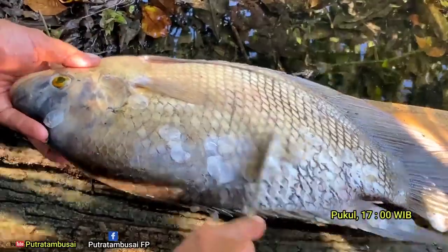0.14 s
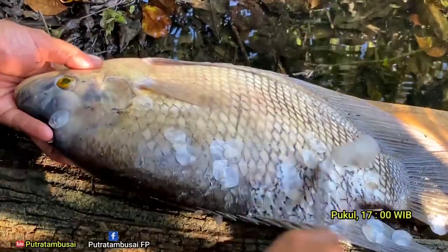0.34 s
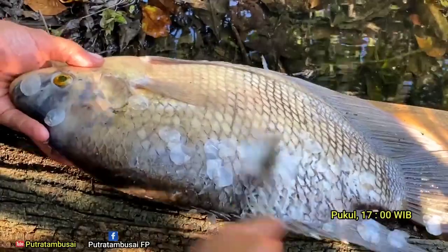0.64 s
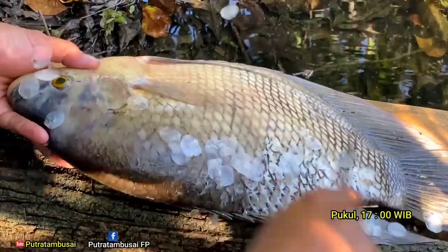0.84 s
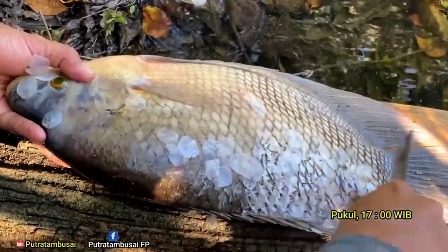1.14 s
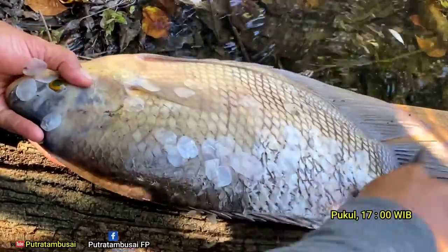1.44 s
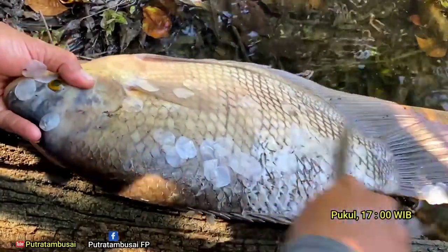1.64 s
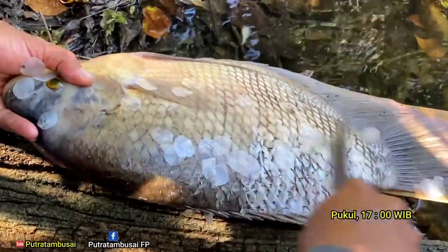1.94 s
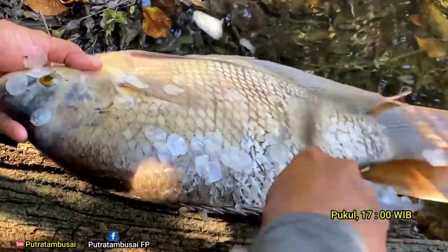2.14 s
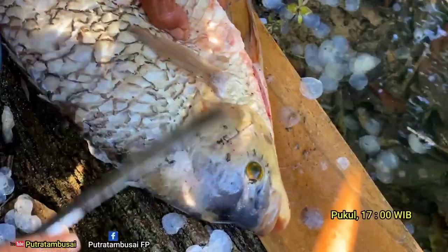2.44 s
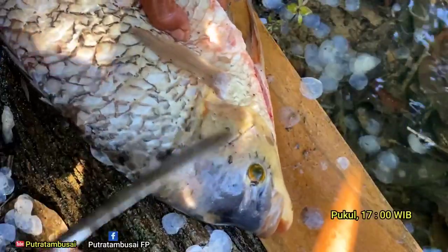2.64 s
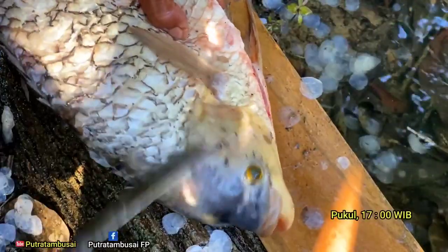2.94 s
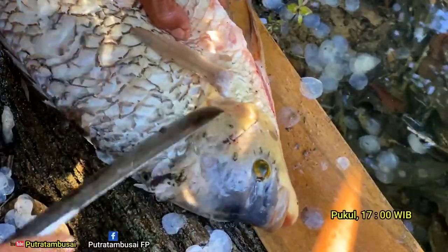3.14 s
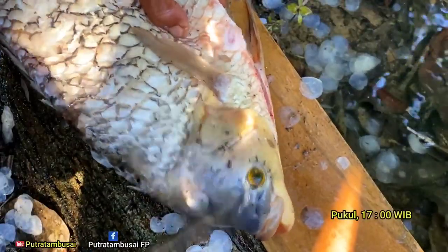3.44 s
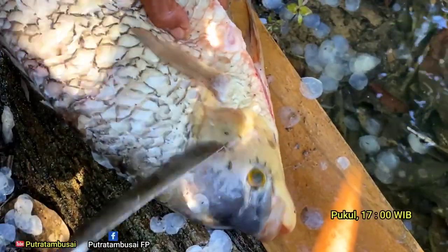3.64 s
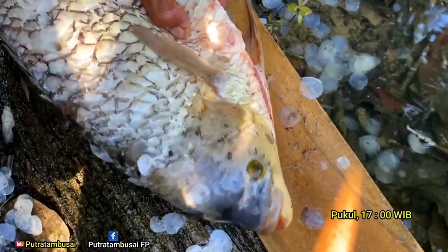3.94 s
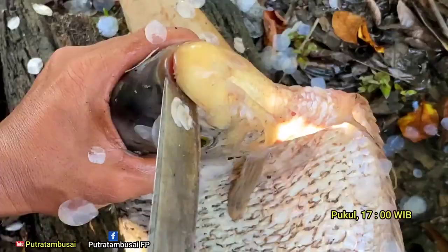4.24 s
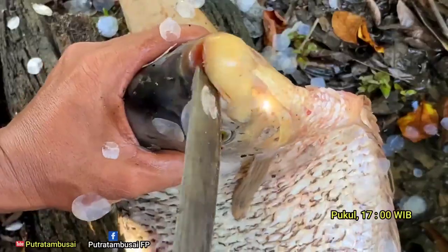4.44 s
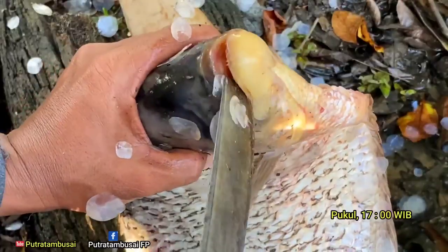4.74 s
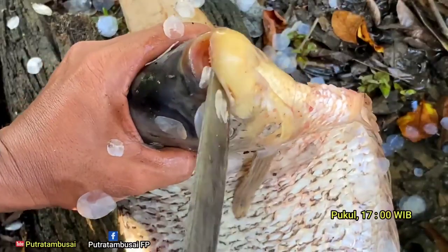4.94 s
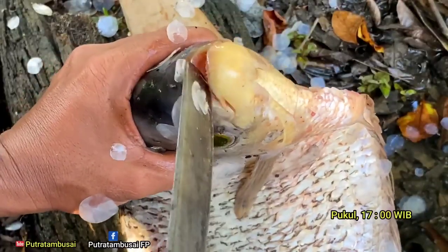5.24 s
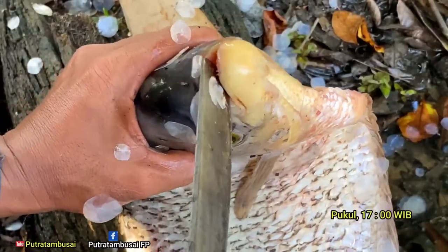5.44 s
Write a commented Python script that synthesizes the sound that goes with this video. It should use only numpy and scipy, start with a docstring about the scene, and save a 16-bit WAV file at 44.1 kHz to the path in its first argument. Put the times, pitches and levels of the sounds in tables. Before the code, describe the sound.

A knife rasps scales off a fish in quick crackling strokes, then picks and scrapes at its bony head, with faint birds behind.

```python
"""Scaling a fish by a river

A knife drags over a fish on a log, about four strokes a second. Friction makes the rasp, bent scales
snap loose, slime squelches and the wet flesh thumps; then picks and scrapes at the bony head excite
the modes of the blade. Far birds, insects, a faint engine and a low outdoor rumble lie behind.
A phone close by hears it all through two microphone ports."""
import sys
import numpy as np
from scipy import signal
from scipy.fft import rfft, irfft
from scipy.io import wavfile
from scipy.ndimage import uniform_filter1d, map_coordinates

SR = 44100
rng = np.random.default_rng(int(sys.argv[2]) if len(sys.argv) > 2 else 0)


def inscribe(sig):
    """Save sig as 16-bit PCM at rate SR to the path in sys.argv[1].

    A 1-D sig is mono; a 2-D sig holds one channel per row.
    Samples are clipped to [-1, 1] before scaling.
    """
    pcm = np.round(np.clip(np.atleast_2d(sig).T, -1, 1) * 32767)
    wavfile.write(sys.argv[1], SR, pcm.astype(np.int16))


N = 246519
TIME = np.arange(N) / SR


def undb(db):
    """Amplitude ratio of a level in decibels."""
    return 10 ** (np.asarray(db) / 20)


def unit(x):
    """Normalisation to rms 1."""
    return x / np.sqrt(np.mean(x ** 2))


def add(track, start_s, sound):
    """Superposition of a sound on a track."""
    i = int(round(start_s * SR))
    lo, hi = max(i, 0), min(i + len(sound), N)
    if hi > lo:
        track[lo:hi] += sound[lo - i:hi - i]


def freqs(size):
    """Bin frequencies of a Fourier transform, kept above zero."""
    return np.maximum(np.arange(size // 2 + 1) * SR / size, 1)


def shape(points, hz):
    """Interpolation of (frequency [Hz], value) points on a logarithmic frequency axis."""
    f, value = np.transpose(points)
    return np.interp(np.log(hz), np.log(f), value)


def colour(x, db):
    """Spectral shaping by a gain for every bin; rms 1."""
    return unit(irfft(rfft(x) * undb(db), len(x)))


def noise(spectrum, size=N):
    """Gaussian noise shaped by (frequency [Hz], level [dB]) points; rms 1."""
    return colour(rng.standard_normal(size), shape(spectrum, freqs(size)))


def wander(position):
    """Smooth random modulation, with a new value at every whole position; spread near 1."""
    return map_coordinates(rng.standard_normal(4096), [position], order=2, mode="wrap")


def envelope(x, smooth_s):
    """Amplitude envelope as a running rms."""
    return np.sqrt(np.maximum(uniform_filter1d(x ** 2, max(int(smooth_s * SR), 1)), 0))


def glides(events, jitter, jitter_hz, shimmer_db, shimmer_hz):
    """Exponential sine sweeps that swell and fade, randomly modulated in pitch and level."""
    out = np.zeros(N)
    for start, length, first_hz, last_hz, db in events:
        t = np.arange(0, length, 1 / SR)
        pitch = np.geomspace(first_hz, last_hz, len(t)) * (1 + jitter * wander(t * jitter_hz))
        gain = undb(db + shimmer_db * wander(t * shimmer_hz)) * np.hanning(len(t))
        add(out, start, gain * np.sqrt(2) * np.sin(2 * np.pi * np.cumsum(pitch) / SR))
    return out


# Phase gap between the microphone ports: (frequency [Hz], lead of the left port [rad])
PORT_PHASE = [(20, 0), (2700, 0), (3400, .5), (5000, .45), (5900, -.6), (6500, 0), (7750, 0), (8100, 2),
              (9000, 2.1), (10400, .15), (11300, -.1), (13300, -3.1), (15300, -6.2)]
def ports(x):
    """Phase difference: both ports hear the same sound, with a gap that depends on frequency."""
    turn = np.exp(0.5j * shape(PORT_PHASE, freqs(N)))
    return np.array([irfft(rfft(x) * turn, N), irfft(rfft(x) / turn, N)])


# How much scattered sound differs between the ports: (frequency [Hz], gain [dB])
DIFFUSE_WIDTH = [(100, -6), (900, 4), (1900, -17.5), (5000, -10.5), (9000, -8.5), (15000, -11)]
def diffuse_side(x):
    """Partial coherence: a diffuse field leaves a difference signal between the ports."""
    return irfft(rfft(x) * undb(shape(DIFFUSE_WIDTH, freqs(N))), N)


# Spectra of the outdoor rumble and the insect chorus: (frequency [Hz], relative level [dB])
RUMBLE_SPECTRUM = [(20, -37.5), (35, -13.5), (55, 4), (120, -2.5), (250, -5), (450, -19), (1000, -29),
                   (2500, -28), (6000, -32.5), (12000, -38.5), (16000, -40.5)]
INSECT_SPECTRUM = [(4000, -29), (6800, -14.5), (7700, 0), (9200, 5), (10400, -8.5), (12500, -18),
                   (15000, -30)]
# Course of the background: (time [s], rumble level [dB], insect level [dB])
BACKGROUND_LEVELS = [(0, -50.5, -66), (1.3, -56.5, -72), (2.098, -57.5, -66), (2.8, -51, -56),
                     (3.5, -57.5, -66.5), (4.2, -57.5, -61.5), (4.6, -53, -57), (5.59, -51.5, -57)]
def riverbank():
    """Ambient noise: a low rumble and the hiss of insects, each slightly amplitude-modulated."""
    times, rumble_db, insect_db = np.transpose(BACKGROUND_LEVELS)
    rumble = noise(RUMBLE_SPECTRUM) * undb(np.interp(TIME, times, rumble_db) + 2 * wander(TIME * 22))
    insects = noise(INSECT_SPECTRUM) * undb(np.interp(TIME, times, insect_db) + 0.8 * wander(TIME * 30))
    return rumble + insects


# Harmonics of a far engine: (multiple of the firing rate, relative level [dB])
ENGINE_ORDERS = [(2, -1.5), (3, -36.5), (4, -11), (5, -4), (6, -2)]
def engine(firing_hz=292, level_db=-64, fade_start_s=0.9, fade_db_per_s=46):
    """Harmonic series on a wavering firing rate: a faint drone that dies away."""
    phase = 2 * np.pi * np.cumsum(firing_hz * (1 + 0.028 * wander(TIME * 50))) / SR
    drone = sum(undb(db + 3.3 * wander(TIME * 14)) * np.sin(round(k) * phase) for k, db in ENGINE_ORDERS)
    return undb(level_db - fade_db_per_s * np.maximum(TIME - fade_start_s, 0)) * drone


def through_trees(x, direct_db=-9, wash_db=-3, wash_s=0.037):
    """Multipath propagation: far sounds arrive mostly by way of leaves and trunks; stereo."""
    t = np.arange(SR // 2) / SR
    paths = rng.standard_normal((2, len(t))) * np.exp(-t / wash_s) / np.sqrt(wash_s * SR / 2)
    return undb(direct_db) * x + undb(wash_db) * signal.fftconvolve(x[None], paths, axes=1)[:, :N]


# Far bird calls: (time [s], duration [s], first pitch [Hz], last pitch [Hz], level [dB])
WHISTLES = [(0.939, .1, 3710, 5490, -42), (1.436, 0.068, 5430, 4500, -50.5),
            (1.471, 0.038, 4410, 4250, -43), (2.805, .055, 1850, 2520, -52), (4.779, .2, 2700, 2910, -53),
            (5.002, 0.075, 2700, 1890, -59.5)]
def birds():
    """Frequency modulation: thin gliding whistles, made unsteady by their way through the trees."""
    return glides(WHISTLES, jitter=0.013, jitter_hz=350, shimmer_db=2, shimmer_hz=120)


def scatter(x, near_s=0.004, near_db=-15, far_s=0.031, far_db=-21, onset_s=0.0077):
    """Early reflections off the log and arm, then reverberation from the trees; different at each port."""
    t = np.arange(SR * 3 // 4) / SR
    spectrum = [(100, 3.5), (800, 1.5), (3000, 2), (7000, 2.5), (15000, -1.5)]
    near = undb(near_db) * np.exp(-t / near_s) / np.sqrt(near_s * SR / 2)
    far = undb(far_db) * np.exp(-t / far_s) / np.sqrt(far_s * SR / 2)
    onset = 1 - np.exp(-t / onset_s)
    responses = [noise(spectrum, len(t)) * (near + far) * onset for _ in range(2)]
    return undb(2.5) * np.array([signal.fftconvolve(x, response)[:N] for response in responses])


# Spectrum of the shaken log: (frequency [Hz], relative level [dB])
LOG_SPECTRUM = [(30, -25.5), (60, 0.5), (100, 5.5), (200, -14), (350, -16.5), (900, -30), (3000, -59)]
def log_rumble(rasp, gain_db=-23):
    """Forced vibration: each stroke shakes the fish and the log under it."""
    return undb(gain_db) * envelope(rasp, smooth_s=0.049) * noise(LOG_SPECTRUM)


# Slime squeezed from under the edge:
# (time [s], duration [s], first pitch [Hz], last pitch [Hz], level [dB])
SQUELCHES = [(1.143, 0.016, 2430, 3860, -30.5), (1.757, 0.019, 2090, 3280, -55),
             (3.31, .016, 3150, 5310, -20.5), (3.411, 0.013, 814, 1050, -55.5)]
def squelches():
    """Resonance of a shrinking gap: as the wet gap closes, its rough whistle rises."""
    return glides(SQUELCHES, jitter=0.05, jitter_hz=2000, shimmer_db=4.2, shimmer_hz=900)


# Slaps of the blade on the flesh: (time [s], relative level [dB], nominal pitch [Hz])
THUMPS = [(0.199, -36.5, 102), (.274, -35, 267), (.49, -37.5, 97), (1.025, -27.5, 186), (1.05, -27.5, 206),
          (1.309, -27, 232), (1.335, -26, 209), (1.381, -29.5, 210), (1.395, -27.5, 258),
          (1.581, -9.5, 554), (1.628, -31, 250), (1.668, -23.5, 252), (1.685, -32, 121.4),
          (1.874, -30, 272), (1.967, -26, 238), (2.166, -22, 292), (2.201, -24.5, 517), (2.222, -28.5, 125),
          (2.275, -27, 191), (2.314, -34, 254), (2.4, -25, 555), (2.445, -25, 390), (2.631, -24, 563),
          (2.856, -30, 580), (3.077, -20.5, 502), (3.113, -30.5, 255), (3.374, -34.5, 220),
          (3.567, -27.5, 275), (3.599, -17.5, 408), (3.81, -41, 595), (4.259, -17.5, 680),
          (4.275, -16, 640), (4.481, -27, 830), (4.502, -15, 763)]
def thumps(first_ratio=2.28, last_ratio=0.855, glide_cycles=0.58, attack_cycles=0.72, ring_cycles=2.25):
    """Damped oscillation: a splash, and a rough thud whose pitch drops as more of the body gives way."""
    out, t = np.zeros(N), np.arange(4096) / SR
    splash_spectrum = [(100, -17), (900, -3), (2000, 10.5), (5000, -20.5), (15000, -25.5)]
    splash_db, splash_s = -15, 0.0013
    for start, db, hz in THUMPS:
        cycles = t * hz
        pitch = hz * (last_ratio + (first_ratio - last_ratio) * np.exp(-cycles / glide_cycles))
        pitch *= np.exp(0.27 * wander(cycles * 2))
        thud = np.sin(2 * np.pi * np.cumsum(pitch) / SR) * undb(2 * wander(cycles * 2))
        thud *= (1 - np.exp(-cycles / attack_cycles)) * np.exp(-cycles / ring_cycles)
        splash = undb(splash_db) * noise(splash_spectrum, len(t)) * np.exp(-t / splash_s)
        add(out, start, undb(db + 4) * (thud + splash))
    return out


def crackle(spectrum, tilt_db, grain_db, grain_hz, ripple_db, size=16384):
    """Stick-slip friction: dense, uneven slips; each patch has its own broad and narrow resonances."""
    hz = freqs(size)
    slips = rng.standard_normal(size)
    slips *= undb(grain_db * np.clip(wander(np.arange(size) / SR * grain_hz), -2, 2))
    resonances_db = ripple_db * (wander(hz / 700) + 0.85 * wander(hz / 170))
    octaves = np.log2(np.maximum(hz, 1500) / 5000)
    return colour(slips, spectrum(hz) + tilt_db * octaves + resonances_db)


def push(t, rise_s, fall_s):
    """Contact pressure peaking at t = 0: Gaussian build-up, exponential release."""
    return np.where(t < 0, np.exp(-(t / rise_s) ** 2), np.exp(-np.abs(t) / fall_s))


def add_burst(track, peak_s, carrier, rise_s, fall_s):
    """Amplitude modulation of a carrier by one push, mixed in to peak at peak_s."""
    t = np.arange(len(carrier)) / SR - 3 * rise_s
    add(track, peak_s - 3 * rise_s, carrier * push(t, rise_s, fall_s))


def drag(carrier, bite_s, hold_s, release_s, ridges_per_s=85, jolt_db=-1, jolt_s=0.0061):
    """Sliding contact: the edge touches, bites, holds and lifts; each ridge gives a decaying jolt."""
    touch_db, settle_s = -14.5, 0.00065  # touch-down relative to full pressure
    t = np.arange(len(carrier)) / SR
    ridges = rng.random(len(t)) < ridges_per_s / SR
    jolts = signal.lfilter([1], [1, -np.exp(-1 / (jolt_s * SR))], ridges.astype(float))
    bite = undb(touch_db * np.maximum(1 - t / bite_s, 0)) * (1 - np.exp(-t / settle_s))
    lift = np.exp(-np.maximum(t - bite_s - hold_s, 0) / release_s)
    return carrier * unit(1 + undb(jolt_db) * np.minimum(jolts, 1)) * bite * lift


# Spectrum of scratched bone: (frequency [Hz], relative level [dB])
BONE_SPECTRUM = [(300, -48), (900, -23.5), (1500, -10), (3000, -5), (8000, 1), (12000, 5.5), (15200, 7),
                 (16500, -25)]
# Modes of the blade held on the head: (frequency [Hz], bandwidth [Hz], relative level [dB])
BLADE_MODES = [(1840, 155, 7.5), (2566, 300, 3), (3390, 41, 16.5), (4380, 190, 5), (5350, 270, 1.5),
               (7220, 390, 7), (8400, 460, 8), (9210, 310, 9.5), (11120, 580, 6.5)]
def blade_on_bone(hz):
    """Modal response in dB: the blade's resonance peaks stand on a weak, broad scratch."""
    power = sum(undb(db) ** 2 / (1 + (2 * (hz - f) / width) ** 2) for f, width, db in BLADE_MODES)
    return shape(BONE_SPECTRUM, hz) + 10 * np.log10(0.5 + power)


def blade_ring(contacts, gain_db=-19):
    """Free decay: the blade's modes sound on for a few milliseconds after each contact."""
    t = np.arange(1024) / SR
    response = np.zeros(len(t))
    for hz, width, db in BLADE_MODES:
        decay = 2 * np.pi * width / SR * np.exp(-np.pi * width * t)
        response += undb(db) * decay * np.sin(2 * np.pi * hz * t)
    return undb(gain_db) * signal.fftconvolve(contacts, response)[:N]


# Scrapes on the head: (time [s], bite [s], hold [s], release [s], level [dB], relative tilt [dB/octave])
HEAD_SCRAPES = [(4.684, 0.0084, .028, 0.007, -33.5, -0.5), (5.277, 0.051, 0.034, 0.0054, -25.5, -1),
                (5.377, 0.016, 0.0037, 0.0079, -37, -2), (5.517, 0.033, 0.019, 0.011, -45, -0.5)]
# The tip catching on scale edges and bone: (time [s], relative level [dB])
TIP_TICKS = [(0.9532, -19.5), (3.441, -33.5), (3.4575, -31), (3.634, -29), (4.3985, -30), (4.4631, -20),
             (4.545, -14), (4.5593, -17), (4.5648, -7.5), (4.829, -23.5), (4.8448, -15.5), (4.861, -30),
             (4.974, -25), (4.9782, -17), (5.1265, -12), (5.1341, -16), (5.311, -9.5), (5.345, -1.5),
             (5.423, -20.5), (5.523, -18), (5.5335, -20), (5.5436, -11.5), (5.5535, -9)]
def head_work():
    """Modal excitation: on the hard head the blade itself rings, in scrapes and dry ticks."""
    out = np.zeros(N)
    for start, bite, hold, release, db, tilt_db in HEAD_SCRAPES:
        scrape = crackle(blade_on_bone, tilt_db - 3, grain_db=2.5, grain_hz=688, ripple_db=-0.7)
        add(out, start, undb(db) * drag(scrape, bite, hold, release))
    for peak_s, db in TIP_TICKS:
        tick = crackle(blade_on_bone, 0.3, grain_db=3, grain_hz=2500, ripple_db=2, size=1024)
        add_burst(out, peak_s, undb(db - 8) * tick, rise_s=0.00049, fall_s=0.0019)
    return out + blade_ring(out)


def edge_side(knife, gain_db=-18):
    """Extended source: slips occur all along the edge, so a little scratch differs between the ports."""
    spectrum = [(100, -8), (550, -0.5), (1100, 0), (2000, -23), (4500, 0), (9000, -3.5), (15000, -3.5)]
    return undb(gain_db) * envelope(knife, smooth_s=0.003) * noise(spectrum)


# Spectrum of raked scales: (frequency [Hz], relative level [dB])
SCALE_SPECTRUM = [(200, -48), (700, -4.5), (1400, -7), (2100, -0.5), (3200, 0), (4500, 0.5), (7000, -1),
                  (8800, -0.5), (11500, -5), (13500, -5), (15200, -11.5), (16200, -41.5)]
def scale_response(hz):
    """Spectral envelope of the scales, in dB."""
    return shape(SCALE_SPECTRUM, hz)


def scale_flicks(rasp, per_s=110, gain_db=-7, spread_db=-2.5):
    """Shot noise: scale edges flick past the blade at random, harder the harder it presses."""
    flicks = (rng.random(N) < per_s / SR) * rng.choice([-1, 1], N)
    strength = undb(spread_db * np.minimum(rng.exponential(size=N), 3))
    clicks = colour(flicks * strength, scale_response(freqs(N)))
    return undb(gain_db) * envelope(rasp, smooth_s=0.0045) * clicks


# Single scales snapping loose: (time [s], level [dB], pitch [Hz])
SNAPS = [(0.0723, -18, 2680), (0.2514, 1.5, 6340), (0.3171, -6.5, 4500), (0.7889, -6.5, 3180),
         (0.833, -6, 2480), (1.046, -3.5, 5360), (1.0962, 2.5, 3570), (1.1629, -11, 5200),
         (1.3813, 0.5, 3480), (1.395, -8, 9650), (1.677, -4, 5000), (1.9675, 1, 3230), (1.9709, 1, 3800),
         (1.9818, -1.5, 4080), (2.2142, -5, 5350), (2.5448, -19.5, 4000), (2.7435, -9, 4100),
         (3.3032, 0.5, 5540), (3.3425, 3.5, 5700), (3.5649, -1, 6900), (3.5738, 0, 4140),
         (3.7964, -9.5, 3840), (3.8162, -3.5, 8570), (4.0545, -2, 8900), (4.4958, 2, 9660)]
def snaps(swing_cycles=0.55, flutter_s=0.0024, flutter_db=-16, lead_s=0.003):
    """Elastic release: a bent scale flips over in little more than one swing, then flutters briefly."""
    out, t = np.zeros(N), np.arange(1024) / SR - lead_s
    for peak_s, db, hz in SNAPS:
        flutter = crackle(scale_response, 0, grain_db=3, grain_hz=2500, ripple_db=3, size=len(t))
        flutter *= undb(flutter_db) * push(t, rise_s=0.00047, fall_s=flutter_s)
        window = np.exp(-np.abs(t * hz / swing_cycles) ** 1.22)
        swing = window * np.sin(2 * np.pi * hz * t + rng.uniform(-2.3, 1))
        add(out, peak_s - lead_s, undb(db) * (swing + flutter))
    return out


# Spectrum of rubbed flesh: (frequency [Hz], relative level [dB])
FLESH_SPECTRUM = [(50, -1), (110, -2.5), (200, -8.5), (270, 3), (370, -6), (540, 4.5), (730, -5),
                  (950, 2.5), (1150, -4), (1450, -15.5), (2500, -37.5)]
# Share of the flesh, growing as the knife nears the gills: (time [s], level relative to the scales [dB])
FLESH_SHARE = [(0, -19), (1.1, -14.5), (2.0, -14.5), (2.7, -12), (3.4, -10), (3.8, -3.5), (4.5, -5.5)]
def rake(time_s, tilt_db):
    """Friction noise of two layers: the edge rakes the scales, and the flesh below adds a dull rub."""
    scales = crackle(scale_response, tilt_db, grain_db=3.5, grain_hz=1103, ripple_db=2)
    flesh = crackle(lambda hz: shape(FLESH_SPECTRUM, hz), 0, grain_db=3.5, grain_hz=294, ripple_db=3.5)
    return scales + undb(np.interp(time_s, *np.transpose(FLESH_SHARE))) * flesh


# Firm strokes and light return brushes over the scales:
# (time [s], bite [s], hold [s], release [s], level [dB], tilt [dB/octave])
STROKES = [(-0.02, 0.022, 0.014, 0.05, -41.5, -0.5), (0.19, 0.048, 0.016, 0.039, -33.5, 0),
           (0.476, .04, 0.016, 0.036, -31, -0.5), (0.759, 0.0034, 0.0086, 0.061, -33, 2),
           (1.014, 0.035, 0.039, 0.036, -30.5, 0.5), (1.3, .002, 0.095, 0.03, -38, 4),
           (1.581, 0.014, 0.089, 0.026, -31, 2.5), (1.87, 0.034, 0.014, 0.023, -28.5, 5.5),
           (1.951, 0.024, 0.0066, 0.033, -33, -2), (2.167, 0.045, 0.0076, 0.014, -27.5, 2.5),
           (2.243, 0.023, 0.053, 0.023, -38, -2.5), (2.4, .003, 0.04, 0.037, -32, 0),
           (2.492, 0.0068, 0.033, 0.025, -43.5, -1.5), (2.624, 0.0065, 0.022, 0.025, -32.5, -1),
           (2.704, 0.023, 0.011, 0.024, -37.5, -1), (2.842, 0.013, 0.0078, 0.029, -32, -0.5),
           (2.935, 0.02, 0.024, 0.032, -46, -3.5), (3.052, 0.016, 0.049, 0.015, -33, -2),
           (3.145, 0.043, 0.013, 0.039, -46.5, 3), (3.294, 0.02, 0.017, 0.0088, -25.5, 3.5),
           (3.523, 0.035, 0.005, 0.024, -35, 4), (3.75, .001, 0.0065, 0.018, -40, 1),
           (3.794, 0.0043, 0.016, 0.014, -33, 4), (3.999, 0.034, 0.016, 0.015, -32.5, 0.5),
           (4.252, 0.0076, 0.017, 0.0096, -26, 0), (4.46, .03, 0.018, 0.0063, -30.5, -1)]
# The edge catches a row of scales and tears it off; the dark row at 1.582 s broadens the heavy slap of the
# blade there: (time [s], level [dB], rise [s], tilt [dB/octave])
CATCHES = [(0.211, -26, 0.0042, 3.5), (0.276, -29.5, 0.0064, -5), (0.561, -30, 0.0039, 1.5),
           (.636, -40, 0.0077, -1), (.787, -16.5, .002, 4), (1.155, -37, 0.0082, -8),
           (1.336, -24.5, 0.015, 2), (1.582, -26.5, .0012, -13), (1.779, -48, .014, -3),
           (1.873, -29, 0.0014, -2.5), (2.167, -32.5, .0015, -7.5), (2.279, -21.5, 0.0053, -0.5),
           (2.402, -21, 0.0028, 0.5), (2.633, -20, .0028, -0.5), (2.859, -22, 0.0049, 8),
           (3.079, -20, .008, 3), (3.114, -16.5, 0.01, 2), (3.32, -31.5, 0.0084, -6),
           (3.343, -16, .003, -1), (3.564, -23, 0.0049, 3), (3.797, -23, .0018, -0.5),
           (4.021, -29, 0.0039, 3), (4.038, -31.5, .004, 0)]
def rasps():
    """Friction follows force: the rasp tracks each drag and swells at every catch and straining scale."""
    out = np.zeros(N)
    for start, bite, hold, release, db, tilt_db in STROKES:
        add(out, start, undb(db) * drag(rake(start, tilt_db), bite, hold, release))
    for peak_s, db, rise_s, tilt_db in CATCHES:
        add_burst(out, peak_s, undb(db) * rake(peak_s, tilt_db), rise_s, fall_s=0.0044)
    for peak_s, db, _ in SNAPS:
        strain = undb(db - 24) * rake(peak_s, tilt_db=0.5)
        add_burst(out, peak_s, strain, rise_s=0.0046, fall_s=0.0037)
    return out


def scene():
    """Mid-side superposition: the knife work close by, the riverbank around it."""
    rasp = rasps()
    knife = rasp + scale_flicks(rasp) + snaps() + squelches() + thumps() + head_work()
    left, right = scatter(knife) + through_trees(birds())
    diffuse = (left - right) / 2 + undb(-7.5) * riverbank()
    side = edge_side(knife) + diffuse_side(diffuse)
    mid = knife + log_rumble(rasp) + engine() + riverbank() + (left + right) / 2
    return ports(mid) + np.array([side, -side])


def record(dry, bottom_hz=40, top_hz=16500):
    """Band limiting and clipping: the deepest bass is taken away, the phone clips at full scale and cuts the
    top."""
    highpass = signal.butter(2, bottom_hz, "highpass", fs=SR, output="sos")
    lowpass = signal.ellip(8, 0.2, 70, top_hz, fs=SR, output="sos")
    clipped = np.clip(signal.sosfilt(highpass, dry), -1, 1)
    return signal.sosfilt(lowpass, clipped)


dry = scene()
out = record(dry)
inscribe(out)
```